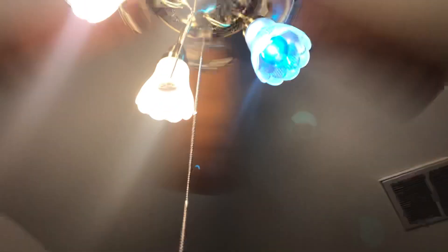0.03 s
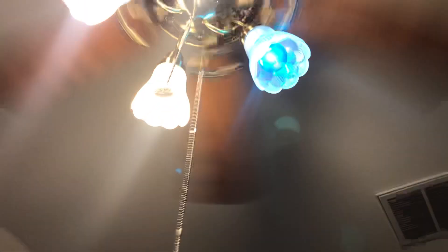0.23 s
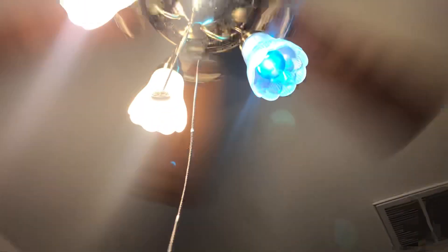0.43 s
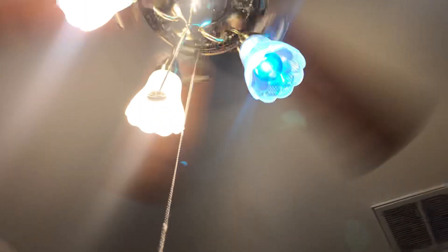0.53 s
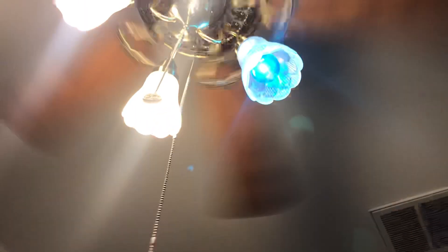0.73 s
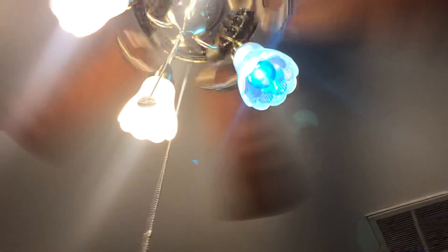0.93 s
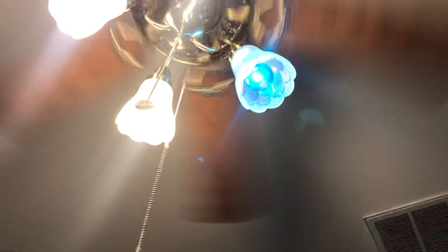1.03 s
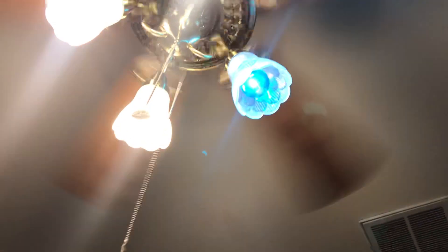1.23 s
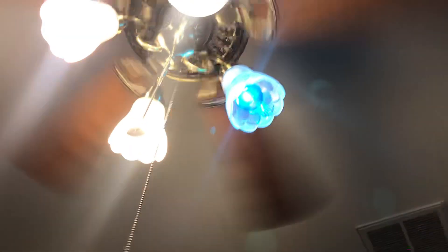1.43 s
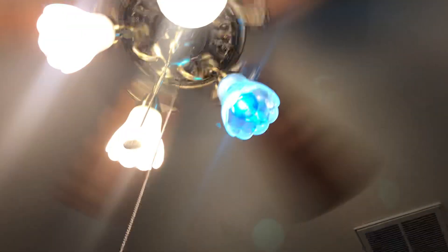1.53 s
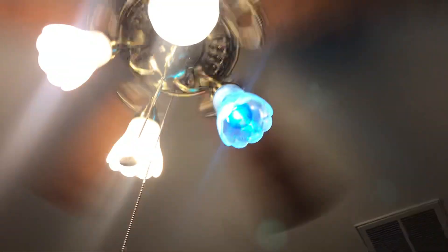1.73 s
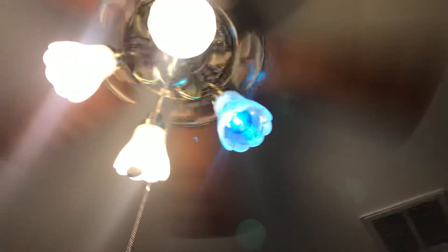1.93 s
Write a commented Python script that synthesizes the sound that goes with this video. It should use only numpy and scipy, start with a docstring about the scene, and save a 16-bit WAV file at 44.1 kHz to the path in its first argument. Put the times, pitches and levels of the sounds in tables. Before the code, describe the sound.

A ceiling fan rattles in a bedroom, its loose lamp fitting alternating sharp knocks with ticks and clacks that briefly ring the shades. The rattle stops, leaving a faint motor hum and soft thumps on the close microphone.

```python
"""A bedroom, just below the lamps of a wobbling ceiling fan.
The loose fitting rocks to and fro: one way it chafes and knocks, the other way it ticks and clacks.
The blows make the metal and glass shades ring briefly, and the pull chain tinkles faintly.
Then the rattle stops and leaves the motor's hum and soft low thumps from handling the microphone."""
import sys
import numpy as np
from scipy import signal
from scipy.fft import rfft, irfft
from scipy.io import wavfile
from scipy.ndimage import uniform_filter1d

SR = 44100
rng = np.random.default_rng(int(sys.argv[2]) if len(sys.argv) > 2 else 0)


def materialize(psi):
    """Save the field psi as 16-bit PCM at rate SR to the path in sys.argv[1].

    A 1-D psi becomes a single channel; in a 2-D psi each row is a channel.
    """
    bounded = np.clip(np.atleast_2d(psi).T, -1, 1)
    quanta = np.round(bounded * 32767).astype(np.int16)
    wavfile.write(sys.argv[1], SR, quanta)


N = 88200

# The ringing notes of the lamp fitting. Each row: pitch in Hz, relative level in dB when knocked,
# the same when clacked, fade time in seconds (a fade time is how long a sound takes to drop 60 dB).
LAMP_NOTES = [(967, -2, -5, 0.2), (1036.5, -4.5, -6.5, 0.19), (1407, -1, -4.5, 0.073),
              (1564, -11, -38.5, 0.12), (1842, -8, -7, 0.31), (1876, -14, -10, 0.31),
              (1960, -23.5, -15.5, 0.31), (2610, -8.5, -42, 0.067), (2770, -10.5, -28, 0.29),
              (3805, -10.5, -26, 0.17), (4220, -10, -17.5, 0.16), (4440, -0.5, -16, 0.099),
              (8600, -24, -14, 0.1), (8646, -19, -13.5, 0.28), (8870, -12, -15.5, 0.21)]
LAMP_RISE_S = 0.0035


def knocks():
    """The fitting slips, then lands with a knock that shakes the shades, bracket and motor housing."""
    # Each row: start in seconds, level in dB, treble tilt in dB per octave, hold time in seconds.
    slips = [(0.1753, -59.5, -2, 0.0033), (0.1823, -50, -1.5, 0.0023), (0.2025, -44.5, -1.5, 0.0027),
             (0.2149, -40.5, -0.5, 0.0017), (0.565, -63, -3, 0.016), (.577, -52.5, -1.5, 0.004),
             (0.6061, -44, -2.5, 0.0022), (0.617, -47, -1, 0.0028), (0.975, -55.5, -4, 0.0075),
             (0.986, -46.5, -0.5, 0.0038), (1.009, -56.5, -3, 0.0026), (1.0166, -43, 0, 0.0052),
             (1.029, -48, -3, 0.0027)]
    # Each row: start in seconds, level in dB, treble tilt in dB per octave, rise and hold times
    # in seconds, then the levels in dB of the lamp's ring, the squeak and the housing's boom.
    landings = [(0.218, -36.5, 0, 0.00042, 0.006, -45, -38, -44),
                (0.6216, -34.5, 0.5, 0.0018, 0.0035, -51, -36.5, -48),
                (1.032, -30.5, 2, 0.0015, 0.0033, -45, -28.5, -41.5)]
    # The tone of a slip and of a knock. Each row: frequency in Hz, relative level in dB.
    slip_colour = [(300, -5.5), (750, -10.5), (1000, -8), (1600, 4.5), (2200, -6), (3700, -8), (4450, -2.5),
                   (5150, -7.5), (5900, -1.5), (8300, -3), (10000, 0), (12500, -10.5), (16000, 0.5)]
    knock_colour = [(120, -28), (200, -12.5), (420, -4), (780, -20), (980, -15.5), (1600, -0.5),
                    (2150, -10), (3300, -11.5), (4000, -8), (4550, -1.5), (5050, -18), (6300, -11.5),
                    (8300, -9), (10500, -20.5), (12700, -17), (14000, -30), (16000, -21)]
    # The low thud and boom. Each row: pitch in Hz, relative level in dB, fade time in seconds.
    bracket_notes = [(255.3, -9.5, 0.16), (314, -0.5, 0.156), (404, 4, 0.12), (490, 9, 0.054)]
    housing_notes = [(135.2, 1.5, 0.37), (111.5, -6.5, 0.69)]
    lamp_notes = [(hz, db, fade_s) for hz, db, _, fade_s in LAMP_NOTES]
    out = np.zeros(N)
    for start, db, tilt_db, hold_s in slips:
        slip = contact(slip_colour, tilt_db, rise_s=0.00086, hold_s=hold_s, decay_s=0.0025,
                       echo_db=-27.5, echo_s=0.007, room_db=-10.5)
        add(out, start, amp(db) * slip)
    for start, db, tilt_db, rise_s, hold_s, ring_db, squeak_db, boom_db in landings:
        knock = contact(knock_colour, tilt_db, rise_s=rise_s, hold_s=hold_s, decay_s=0.0024,
                        echo_db=-5, echo_s=0.011, room_db=-16)
        add(out, start, amp(db) * knock)
        add(out, start, amp(ring_db) * ring(lamp_notes, LAMP_RISE_S, flutter=1))
        add(out, start + 0.0022, amp(squeak_db) * squeak())
        add(out, start, amp(db - 24) * ring(bracket_notes, rise_s=0.0063))
        add(out, start, amp(boom_db) * ring(housing_notes, rise_s=0.028))
    return out


def clacks():
    """On the way back the fitting ticks three times and shuts with a bright clack."""
    # Each row: start in seconds, level in dB, treble tilt in dB per octave.
    ticks = [(0.3532, -44, 0), (0.4035, -37.5, 1), (.421, -35.5, 0.5), (0.75, -49.5, -1),
             (0.7981, -37.5, 2.5), (0.8157, -34.5, 0.5), (1.1451, -46, 0.5), (1.195, -42, 1.5),
             (1.2194, -39, 1)]
    # Each row: start in seconds, level in dB, treble tilt in dB per octave, ring level in dB.
    closings = [(0.4272, -30.5, -0.5, -41.5), (0.8212, -32.5, 0, -43), (1.243, -34, 0.5, -47.5)]
    # The tone of a tick and of a clack. Each row: frequency in Hz, relative level in dB.
    tick_colour = [(290, -46), (500, -3.5), (850, -21.5), (1300, 0), (1600, 3), (2160, -9), (2570, -9.5),
                   (4200, -13), (5200, -17), (7300, -9), (8700, -2.5), (10000, -11), (11100, -5),
                   (13000, -10.5), (14200, -22), (16000, -3.5)]
    clack_colour = [(180, -35), (300, -0.5), (700, -24), (1000, -30.5), (1700, 4), (2200, -3), (2550, 0),
                    (3500, -4.5), (4000, -8.5), (5600, -7), (7500, -4.5), (9500, 3), (10400, -5),
                    (12000, -7), (12900, -1.5), (14100, -25), (16000, -13)]
    lamp_notes = [(hz, db, fade_s) for hz, _, db, fade_s in LAMP_NOTES]
    out = np.zeros(N)
    for start, db, tilt_db in ticks:
        tick = contact(tick_colour, tilt_db, rise_s=0.00058, hold_s=0.0017, decay_s=0.004,
                       echo_db=-11, echo_s=0.0061, room_db=-15)
        add(out, start, amp(db) * tick)
        add(out, start, amp(db - 19.5) * ring(lamp_notes, LAMP_RISE_S, flutter=1))
    for start, db, tilt_db, ring_db in closings:
        clack = contact(clack_colour, tilt_db, rise_s=0.00052, hold_s=0.0025, decay_s=0.0005,
                        echo_db=-8.5, echo_s=0.0147, room_db=-18)
        add(out, start, amp(db) * clack)
        add(out, start, amp(ring_db) * ring(lamp_notes, LAMP_RISE_S, flutter=1))
    return out


def contact(colour, tilt_db, rise_s, hold_s, decay_s, echo_db, echo_s, room_db):
    """Two parts touch: a brief chatter, quick echoes off blades and ceiling, then the room's echo."""
    t = half_second()
    onset = np.minimum(t / rise_s, 1)
    touch = np.exp(-np.maximum(t - hold_s, 0) / decay_s)
    echoes = amp(echo_db) * np.exp(-t / echo_s)
    envelope = onset * np.hypot(touch, echoes)
    room = metal_joint(room_echo(), colour, tilt_db, peak_depth=0.54)  # the room blurs the peaks
    return metal_joint(chatter(envelope), colour, tilt_db) + amp(room_db) * room


def chatter(envelope):
    """A burst of tiny random touches whose loudness follows the envelope."""
    burst = rng.standard_normal(len(envelope)) * envelope
    for _ in range(3):
        flat = irfft(np.exp(1j * np.angle(rfft(burst))), len(burst))  # all frequencies equally strong
        loudness = np.sqrt(abs(uniform_filter1d(flat ** 2, size=64)) + 1e-12)
        burst = envelope * np.tanh(0.5 * flat / loudness)
    return burst * np.linalg.norm(envelope) / np.linalg.norm(burst)


def metal_joint(sound, colour, tilt_db, peak_depth=1, size=4096):
    """Gives a contact its own tone, plus the bright peaks at which the metal joint vibrates."""
    # Each row: frequency in Hz, height of the peak in dB.
    joint_peaks = [(1000, 15.5), (2500, 9.5), (2850, 2.5), (3270, 8.5), (3640, 11), (4450, 7), (5850, 6),
                   (6450, 5), (6950, 4.5), (7820, 2), (8130, 7), (8650, 4.5), (8950, 7.5), (9620, 9.5),
                   (10700, 5.5), (11100, 6.5), (11700, 9.5), (12620, 9), (13340, 16), (15100, 3)]
    hz = abs(np.fft.fftfreq(size, 1 / SR))
    peaks = 1
    for peak_hz, db in joint_peaks:
        width_hz = 91 + 0.0082 * peak_hz
        peaks += (amp(db) - 1) / (1 + (2 * (hz - peak_hz) / width_hz) ** 2)
    tone_db = look_up(colour, hz) + tilt_db * np.log2(np.maximum(hz, 500))
    log_gain = np.log(np.maximum(peaks, 1e-3) ** peak_depth * amp(tone_db))
    # Build the filter so that nothing sounds before the touch.
    spectrum = np.exp(np.conj(signal.hilbert(log_gain)))
    response = np.fft.ifft(spectrum).real[:size // 2]
    return signal.fftconvolve(sound, response / np.linalg.norm(response))[:len(sound)]


def ring(notes, rise_s, flutter=0):
    """A struck part's notes die away, never twice alike. Flutter is the waver that room echoes add."""
    t, out = half_second(), 0
    flutter_times = np.arange(0, 1, 0.011)
    for hz, db, fade_s in notes:
        real, imag = rng.standard_normal((2, 256))[:, :len(flutter_times)]
        echoes = 1 + flutter * np.interp(t, flutter_times, real + 1j * imag)
        tone = (echoes * np.exp(2j * np.pi * (hz * t + rng.random()))).real
        scatter_db = 0.5 * rng.standard_normal()  # a blow stirs the notes unevenly
        out += amp(db + scatter_db - 60 * t / fade_s) * tone
    return np.sqrt(2 / (1 + flutter ** 2)) * out * (1 - np.exp(-t / rise_s))


def squeak(pitch_hz=4480, waver_hz=160):
    """The joint squeaks for a few milliseconds as it settles into place."""
    t = half_second()
    hz = pitch_hz + waver_hz * unit(uniform_filter1d(rng.standard_normal(len(t)), size=40))
    return np.sqrt(2) * swell(t, peak_s=0.0022) * np.sin(2 * np.pi * np.cumsum(hz) / SR)


def room_echo(rise_s=0.0036):
    """Echoes off the bedroom walls build up, then die away at each frequency's own speed."""
    # Each row: frequency in Hz, fade time in seconds.
    fade_times = [(300, 0.43), (800, 0.46), (2000, 0.21), (5500, 0.35), (9000, 0.1952), (12500, 0.24),
                  (15000, 0.38)]
    # Each row: frequency in Hz, relative level of the echoes in dB.
    room_colour = [(300, 4.8), (750, 1.6), (1100, 8.9), (2000, 6.1), (3200, 6), (4500, 4.4), (6500, 4.9),
                   (8000, 2.2), (9400, 1), (11000, 2.8), (13000, 0.9), (15000, 1.8)]
    t = half_second()
    hz, times, bands = signal.stft(rng.standard_normal(len(t)), SR, nperseg=256)
    bands *= amp(look_up(room_colour, hz)[:, None] - 60 * times / look_up(fade_times, hz)[:, None])
    echoes = signal.istft(bands, SR, nperseg=256)[1][:len(t)]
    return echoes * (1 - np.exp(-(t / rise_s) ** 2))


def pull_chain():
    """The swaying chain touches the lamp: one tap at the start, two faint tinkles near the end."""
    # Each row: frequency in Hz, relative level in dB.
    tap_colour = [(500, -18), (2600, -15), (3550, -4.5), (4600, -10), (5700, -4), (7000, -14.5),
                  (9000, -25), (16000, -24)]
    # Each row: start in seconds, level in dB, pitch in Hz, fade time in seconds.
    tinkles = [(1.582, -67.5, 8662, 0.054), (1.927, -76, 8650, 0.057)]
    out = np.zeros(N)
    tap = contact(tap_colour, tilt_db=0, rise_s=0.00027, hold_s=0.0011, decay_s=0.00089,
                  echo_db=-13, echo_s=0.004, room_db=-23)
    add(out, 0.026, amp(-52) * tap)
    for start, db, hz, fade_s in tinkles:
        add(out, start, ring([(hz, db, fade_s)], rise_s=0.0005))
    return out


def motor(hum_hz=120):
    """Mains power makes the motor hum. It comes and goes in the rattle, then holds steadier."""
    # Each row: time in seconds, level in dB.
    hum_levels = [(0, -93), (.5, -66.5), (.68, -52), (.9, -82), (1.05, -53.5), (1.2, -58), (1.4, -51.5),
                  (1.7, -57.5), (2, -54)]
    t = np.arange(N) / SR
    level_db = np.interp(t, *np.transpose(hum_levels))
    return np.sqrt(2) * amp(level_db) * np.sin(2 * np.pi * (hum_hz * t + rng.random()))


def handling_thumps():
    """Handling the microphone makes soft low thumps."""
    # Each row: start in seconds, level in dB, pitch in Hz.
    thumps = [(0, -60, 39.4), (.058, -49.5, 53), (0.432, -51, 56.6), (0.474, -40, 54), (0.534, -44.5, 65),
              (0.602, -41, 78), (0.881, -49, 46), (1.032, -38.5, 56.7), (1.476, -45, 55),
              (1.729, -41.5, 62.6), (1.82, -50, 55), (1.88, -55, 51.3)]
    t, out = half_second(), np.zeros(N)
    for start, db, hz in thumps:
        tone = np.sin(2 * np.pi * (hz * t + rng.random()))
        add(out, start, amp(db) * swell(t, peak_s=0.012) * tone)
    return out


def air():
    """A low wash of moving air, with a faint hiss."""
    # Each row: frequency in Hz, relative level in dB.
    air_colour = [(12, -29), (25, -17.5), (53, -4), (86, -14), (130, -11.5), (160, -15), (200, -16),
                  (300, -21), (459, -29.5), (718, -29.5), (1960, -38.5), (4000, -44), (8000, -47),
                  (16000, -50)]
    gains = amp(look_up(air_colour, np.fft.rfftfreq(N, 1 / SR)))
    return amp(-59) * unit(irfft(rfft(rng.standard_normal(N)) * gains, N))


def swell(t, peak_s):
    """A smooth curve that climbs to 1 and falls away."""
    return (t / peak_s * np.exp(1 - t / peak_s)) ** 2


def amp(db):
    """Turns decibels into a number to multiply by."""
    return 10 ** (np.asarray(db) / 20)


def unit(sound):
    """Scales a sound to an average power of 1."""
    return sound / np.sqrt(np.mean(sound ** 2) + 1e-20)


def look_up(table, hz):
    """Reads between a table's rows, with octaves evenly spaced."""
    row_hz, values = np.transpose(table)
    return np.interp(np.log(hz + 1), np.log(row_hz + 1), values)


def add(mix, start_s, sound):
    """Mixes a sound in at its start time."""
    part = mix[max(round(start_s * SR), 0):][:len(sound)]
    part += sound[:len(part)]


def half_second():
    """The sample times of half a second."""
    return np.arange(SR // 2) / SR


def scene():
    """The rattling fan over its hum, its draught and soft thumps, in one channel."""
    return (knocks() + clacks() + pull_chain() + motor() + air() + handling_thumps())[None]


def record(dry, cutoff_hz=15800):
    """Cuts away the very highest treble."""
    low_pass = signal.firwin(511, cutoff_hz, window=("kaiser", 9), fs=SR)
    return signal.oaconvolve(dry, low_pass[None], "same")


dry = scene()
out = record(dry)
materialize(out)
```